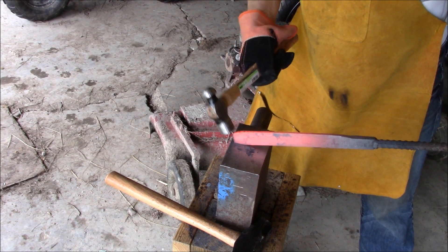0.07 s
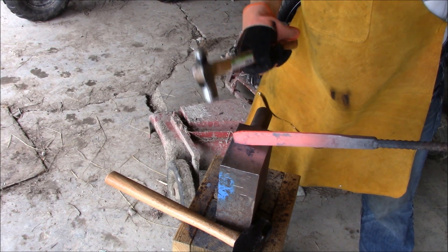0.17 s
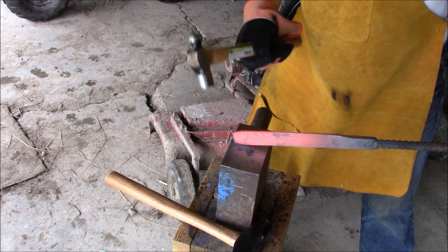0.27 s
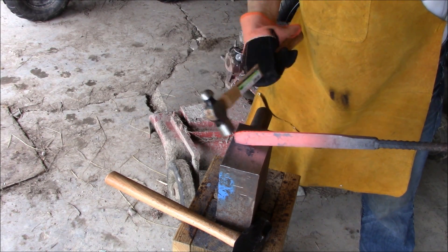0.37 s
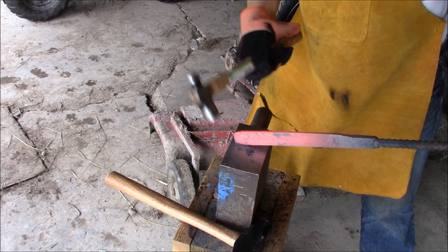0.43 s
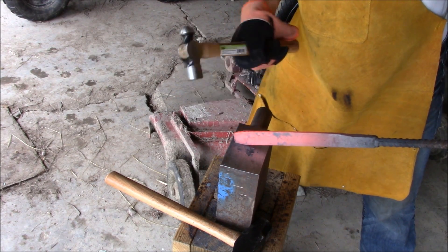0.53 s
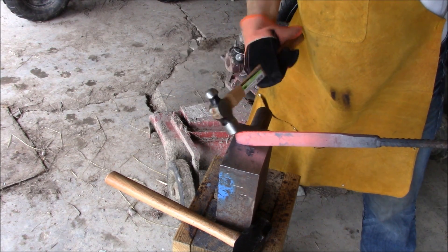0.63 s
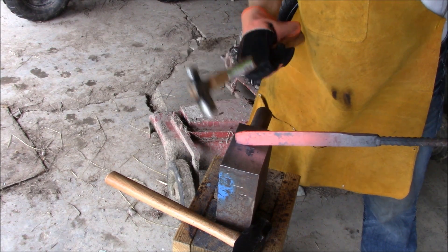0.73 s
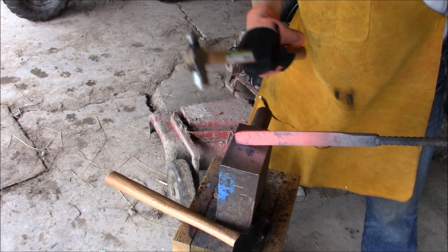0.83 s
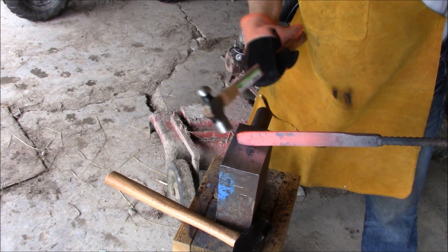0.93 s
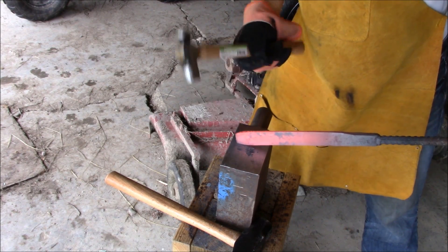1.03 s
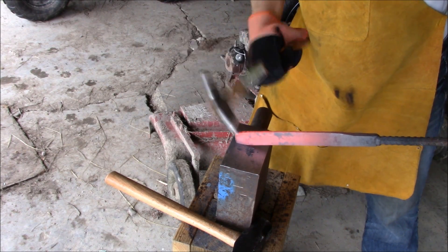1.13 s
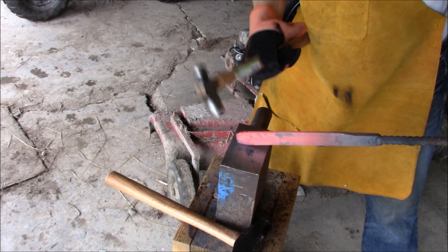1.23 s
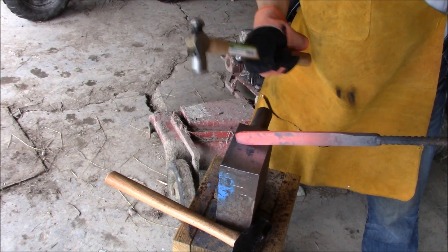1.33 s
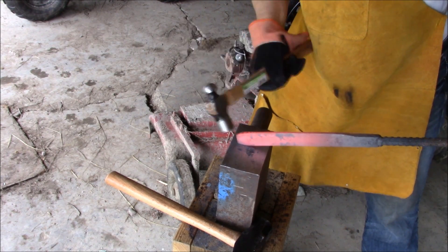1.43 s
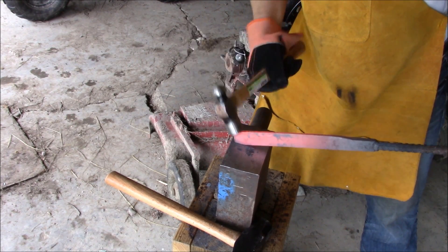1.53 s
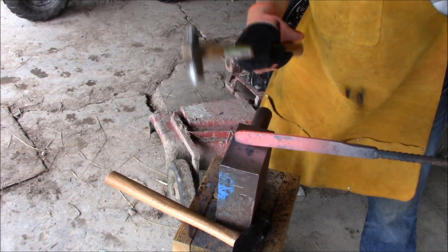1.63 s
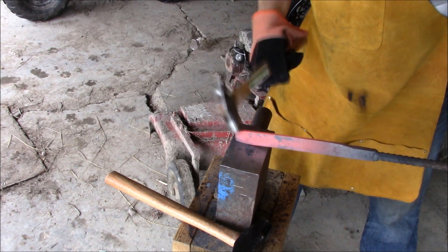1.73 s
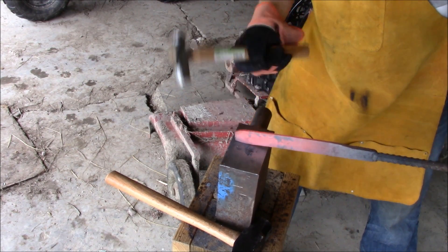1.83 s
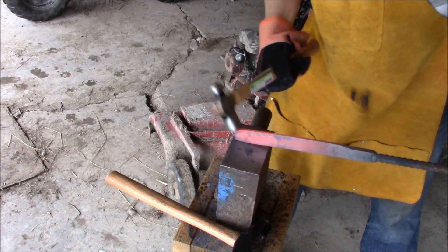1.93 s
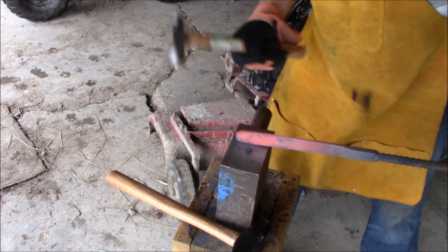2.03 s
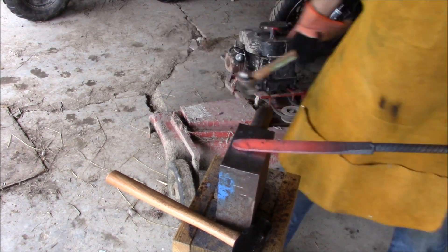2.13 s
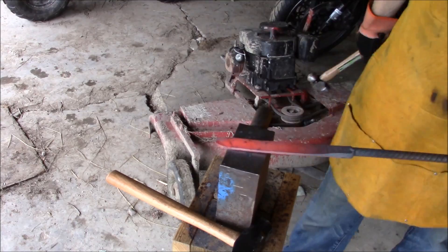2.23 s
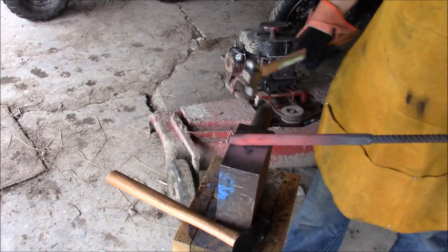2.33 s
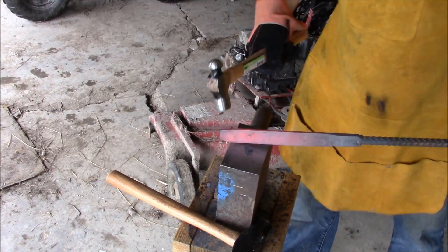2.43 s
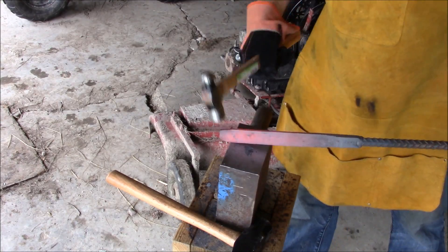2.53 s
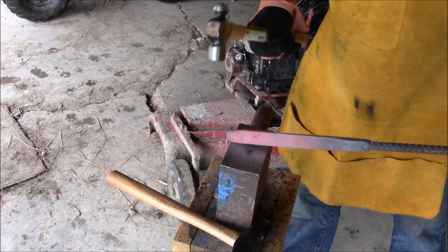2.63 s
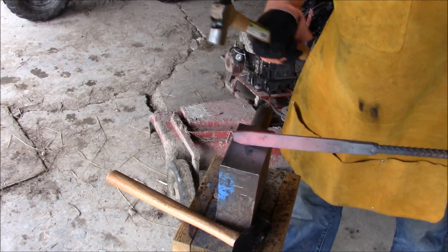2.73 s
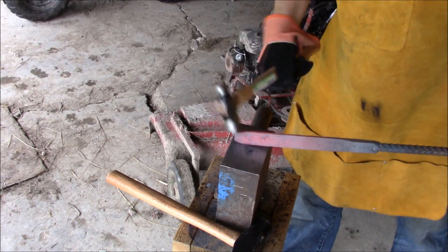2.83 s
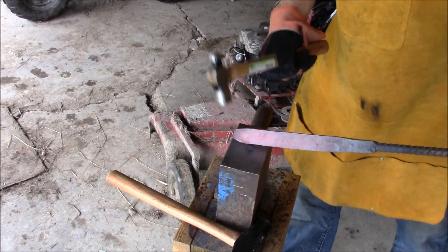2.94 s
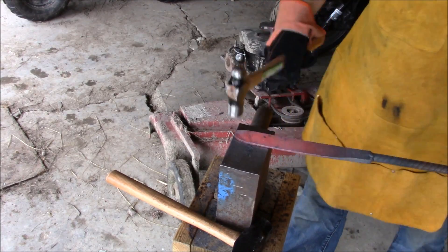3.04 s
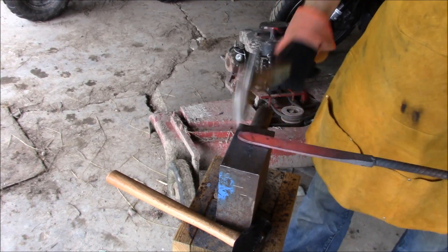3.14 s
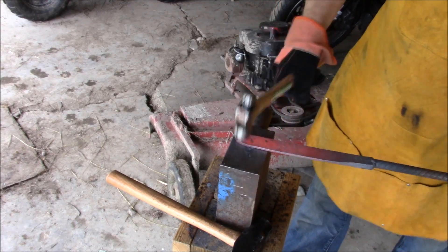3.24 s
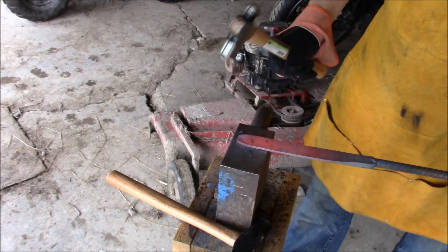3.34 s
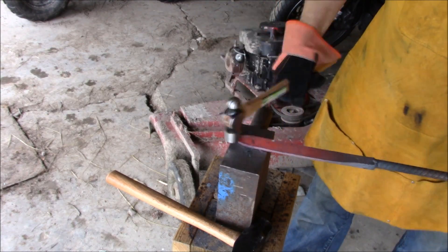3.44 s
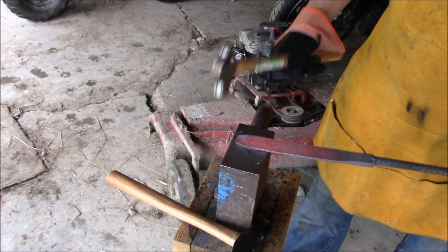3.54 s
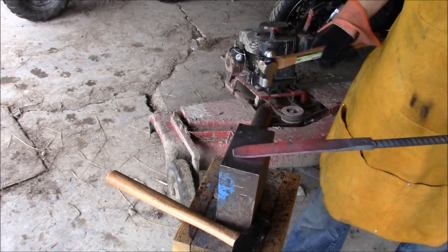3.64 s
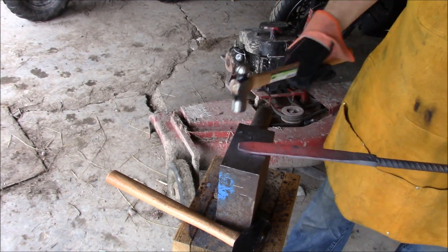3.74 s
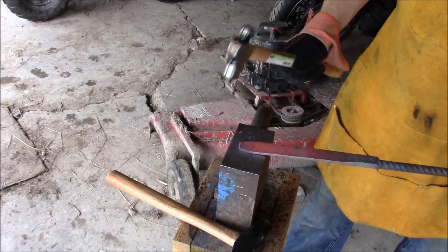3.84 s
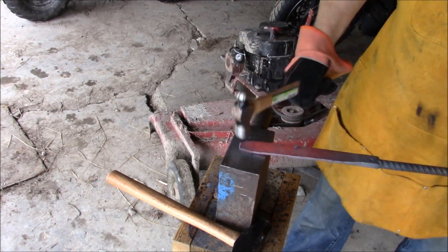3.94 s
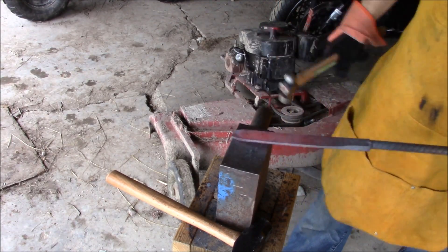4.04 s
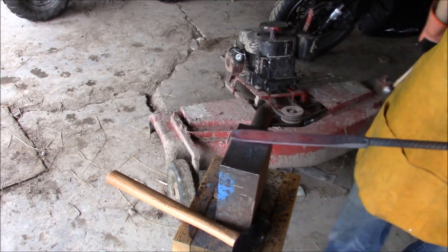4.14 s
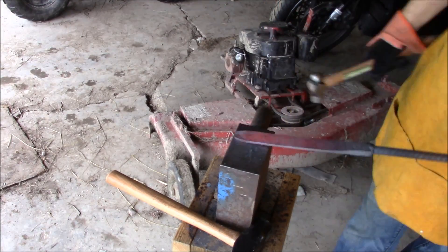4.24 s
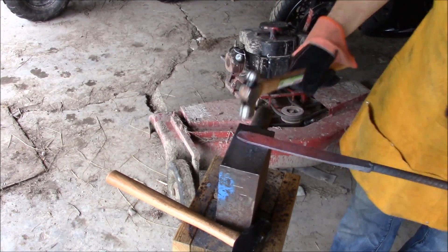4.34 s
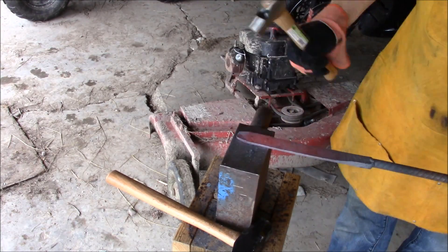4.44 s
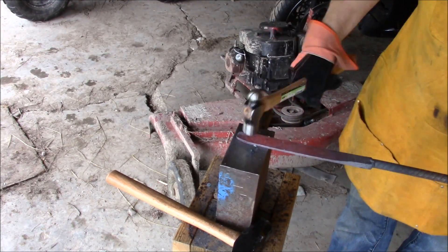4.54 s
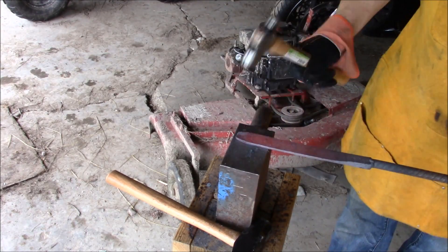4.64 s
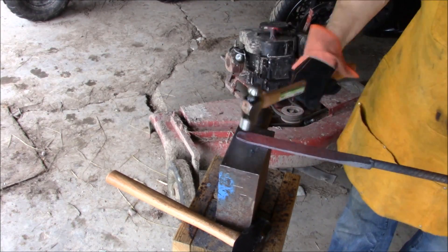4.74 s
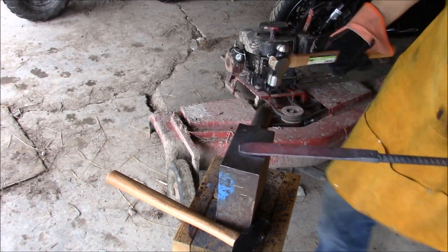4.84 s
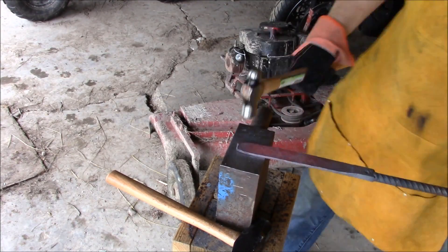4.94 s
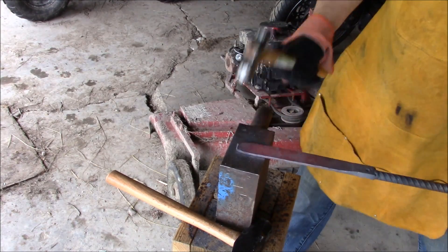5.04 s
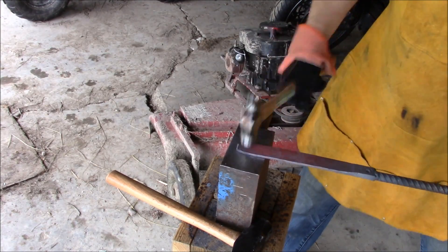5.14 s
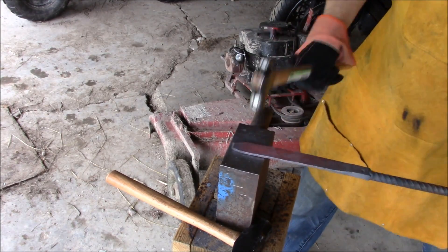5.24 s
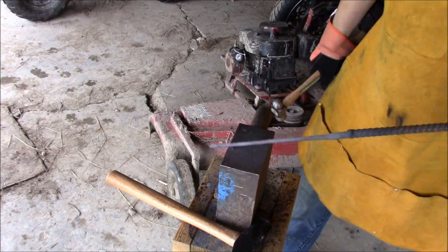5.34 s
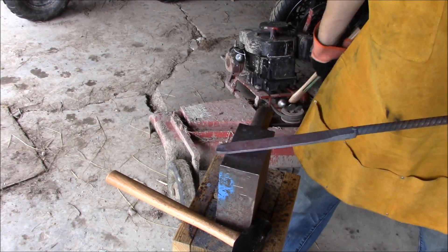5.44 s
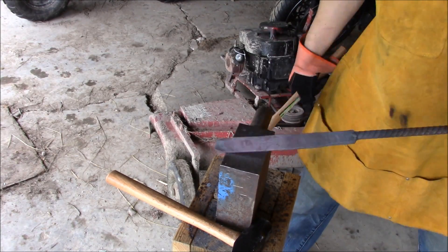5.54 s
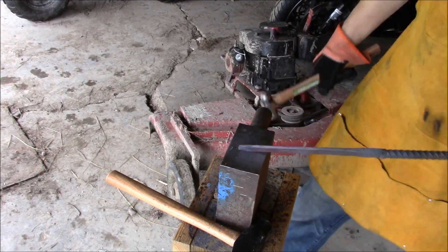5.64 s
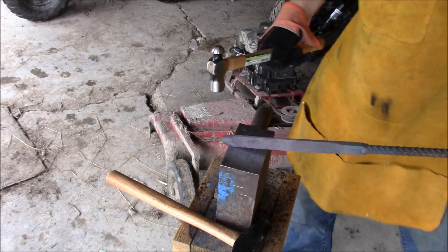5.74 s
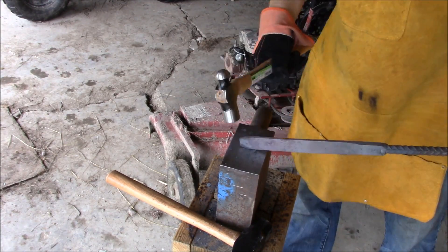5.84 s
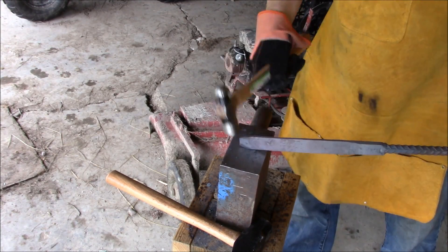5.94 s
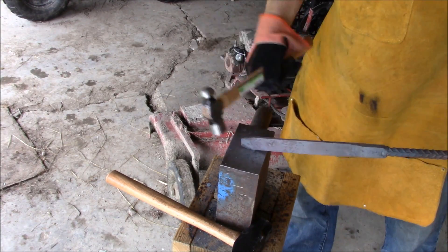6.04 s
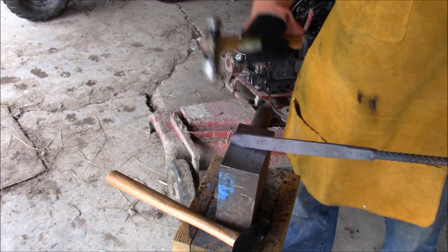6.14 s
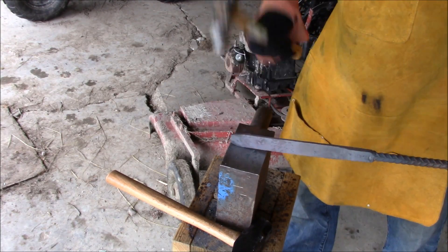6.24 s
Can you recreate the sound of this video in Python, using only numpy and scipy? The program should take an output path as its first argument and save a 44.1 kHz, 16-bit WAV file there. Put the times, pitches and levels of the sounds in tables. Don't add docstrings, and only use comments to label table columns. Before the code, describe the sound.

Close, nearly mono sound of a hammer on a hot steel bar over a small anvil in a bare concrete workshop. Quiet air and a very faint distant hum open it. From 0.3 to 1.4 s come five evenly spaced full blows, slightly growing, each a crack with ringing steel, a low stump thud and short hard-walled echoes. A tiny silence falls near 1.57 s. Then all is four times faster and higher, with brighter hiss: a rapid run of crisp, pinging blows from 1.6 to 2.1 s, faint scrapes and a clink, a light tap at 2.56, more blows 2.75-3.0 and 3.2-3.6, three around 3.9. Clinks, a scrape and a tap fill 4.1-4.45; bright bursts follow at 4.5-4.8 and 5.15-5.3, with knocks and a tap between. Clinks, a knock and a scrape lead to a tap at 5.96 and two last strikes at 6.1 and 6.2 s.

```python
import sys
import numpy as np
from scipy import signal
from scipy.fft import rfft, irfft, next_fast_len
from scipy.io import wavfile
from scipy.ndimage import uniform_filter1d, minimum_filter1d, map_coordinates

SR = 44100
rng = np.random.default_rng(int(sys.argv[2]) if len(sys.argv) > 2 else 0)


def undo_db(level):
    steps = np.asarray(level, float) / 20
    return 10 ** steps


def store_pcm(level_fs):
    pcm = np.round(np.clip(level_fs, -1, 1) * 32767).astype(np.int16)
    wavfile.write(sys.argv[1], SR, np.atleast_2d(pcm).T)


N = 277212
TIME = np.arange(N) / SR
SPEED = 4
TOP_HZ = 16000

# from, to [t/s]
CUT = (1.5592, 1.5918)

# [t/s, strength level/dB, brightness level/dB, own ring f/Hz], some with [own ring level/dB]
SLOW_BLOWS = [
    (0.331, -16, -12, 4000),
    (0.609, -14, -11, 4060),
    (0.873, -13.5, -10.5, 9400),
    (1.127, -12, -12, 6800),
    (1.382, -11.5, -11.5, 9480),
]
EARLIER_BLOW = [
    (1.542, -18.5, -10, 12000),
]
FAST_BLOWS = [(1.609, -15.5, -10, 10300), (1.679, -14.5, -13, 12800), (1.746, -14, -11.5, 10070),
              (1.812, -13.5, -11, 12000), (1.88, -13.5, -12, 12000), (1.945, -13, -14.5, 12000),
              (2.01, -15, -10.5, 12000), (2.075, -14.5, -12, 12000), (2.752, -20, -11, 12900),
              (2.834, -19, -9, 9800), (2.909, -16, -10, 9810), (2.976, -12.5, -13.5, 9420),
              (3.216, -18.5, -18.5, 6800), (3.294, -15, -10.5, 8900), (3.368, -16, -8.5, 12000),
              (3.435, -15.5, -11.5, 12000), (3.503, -15.5, -9.5, 12000), (3.57, -16.5, -8.5, 12000),
              (3.864, -22.5, -10.5, 9200), (3.938, -17, -8.5, 8900), (4.007, -18.5, -8, 12000),
              (4.537, -17, -9, 12000), (4.609, -17, -8, 12000), (4.674, -15.5, -8.5, 12000),
              (4.737, -17, -8.5, 9600), (4.805, -18, -5.5, 12000), (5.154, -15, -8.5, 12000),
              (5.214, -16.5, -7, 12000), (5.275, -16.5, -7, 12000), (6.093, -18, -7, 12900),
              (6.232, -21.5, -9, 13000)]
TAPS = [
    (2.563, -22.5, -20, 3660, 5.5),
    (3.129, -17, -26.5, 12900, -8.5),
    (4.428, -15, -22.5, 4760, -0.5),
    (5.053, -14, -22.5, 4140, -5),
    (5.964, -19, -19, 4500, 2.5),
]
CLINKS = [(2.161, -43.5, -9, 6390, 8), (2.295, -27, -30, 3030, -9), (3.691, -32.5, -14, 6850, 4),
          (3.699, -34, -15, 13400, -4), (3.7092, -39, -9, 6890, 1), (3.761, -32, -18, 12900, 7),
          (4.0945, -34, -16.5, 9000, -10), (4.109, -33, -12, 6780, 5), (4.2944, -61, -4, 3320, -10),
          (4.3031, -34.5, -9.5, 9600, -3), (4.9053, -39.5, -6.5, 11700, -3),
          (5.4281, -25.5, -17.5, 14400, -4), (5.5244, -68, -4, 3120, -8), (5.6474, -28.5, -23, 8150, 7)]
KNOCKS = [
    (0.022, -60.5, -3, 1890, -14),
    (2.176, -44, -30, 1500, 3),
    (4.877, -35, -18, 1300, -4),
    (4.882, -48, -5, 988, -6),
    (4.97, -35, -9.5, 1920, 6),
    (5.407, -55, -21, 970, 2),
    (5.742, -36, -5, 1180, 5.5),
]
# [loudest t/s, level/dB, centre f/Hz, rise t/s, fall t/s]
DRAGS = [
    (2.239, -50, 4600, 0.012, 0.046),
    (2.278, -39, 4250, 0.033, 0.016),
    (4.201, -34.5, 6350, 0.015, 0.037),
    (5.839, -33, 6450, 0.02, 0.044),
]

# [f/Hz, width f/Hz, level/dB]; bar and anvil at true speed
SLOW_RING = [(463, 12, -2), (695, 43, -2), (806, 72, -1.5), (1014, 45, 1), (1180, 120, -4),
             (1714, 106, -3.5), (1914, 17, 0), (2514, 260, -4.5), (3140, 154, -6.5),
             (4040, 67, -5), (4750, 67, -7.5), (4970, 37, -2.5), (5720, 58, -15), (5980, 120, -0.5),
              (6760, 43, -8), (7125, 100, -3), (7400, 57, -12), (8180, 180, -7), (8600, 46, -28),
              (9200, 330, -15.5), (9560, 170, -9.5), (10630, 47, -9.5), (11200, 67, -14)]
FAST_RING = [(1310, 30, -7), (1850, 30, -12.5), (1910, 30, -21), (2740, 290, -9), (3280, 280, -12),
             (4020, 530, -9), (4760, 60, -7.5), (7400, 130, -9.5), (7910, 160, -10.5), (9800, 110, -15),
             (9600, 140, -6), (10170, 125, -6), (12000, 60, -7), (13440, 230, -9)]
TAP_RING = [(992, 77, 7.5), (1920, 75, 6), (3650, 540, 0), (4180, 410, -2.5), (4600, 160, 1),
            (8050, 78, -12), (9800, 140, -14), (10270, 220, -2.5), (12000, 130, -15), (14200, 250, -20)]
CLINK_RING = [(1890, 17, 0), (5000, 69, 12), (6890, 25, 18), (8100, 30, 9), (9580, 100, 12), (11700, 49, 6),
              (12900, 63, 4), (15300, 63, -3)]

# [f/Hz, level/dB per Hz]
SLOW_TONE = [(40, -56), (150, -9), (250, 2.5), (410, -4.5), (1000, -3), (8000, -19.5), (14000, -25),
             (16500, -53)]
FAST_TONE = [(100, -60), (300, -23), (500, -11), (1000, 0), (2500, -6), (6000, -5), (12000, -4.5),
             (16500, -13.5)]
CLINK_TONE = [(180, -54), (300, 6.5), (1930, 22), (6340, 10), (6900, 15), (14900, 20), (16500, 17)]
KNOCK_TONE = [(180, -51), (300, -9), (1960, -3.5), (3590, -9), (12600, -31), (14900, -41), (16500, -26)]
DRAG_TONE = [(180, -72), (300, -62), (1000, -3), (1630, -9.5), (6670, -5.5), (14700, -11.5), (15700, -15),
             (16500, -37)]

# [f/Hz, t60 t/s]
STUMP = [(101, .6), (156, .5), (193, .45), (250, .45), (328, .4)]
SLOW_STUMP_DB = [-11.5, -8.5, -4.5, 1.5, -1]
FAST_STUMP_DB = [-11, -2.5, -2, -3, -8.5]
SCATTER_DB = dict(slow=1.3, fast=2.0, tap=1.5)

# [f/Hz, t60 t/s]
SHOP = [(60, 0.68), (210, 0.49), (560, 0.48), (1500, 0.41), (4000, 0.38), (8000, 0.28), (11000, 0.27),
        (16000, 0.22)]
# [f/Hz, t/s]
BUILD = [(200, 0.0083), (1000, 0.0058), (3000, 0.011), (10000, 0.0046)]
# [f/Hz, level/dB per Hz]
SLOW_AIR = [(25, -29), (245, -25), (339, -26.5), (420, -26), (800, -19), (1000, -24.5), (3060, -36.5),
            (16500, -58.5)]
# [f/Hz, level/dB per Hz]
FAST_AIR = [(15, -41), (150, -16), (304, -7.5), (902, 0), (3320, 2.5), (10100, -12), (12200, -8),
            (16500, -18)]
AIR_DB = -57.5, -54.5
# [f/Hz, level/dB]
MOTOR = [
    (646.0, -60),
]
# [f/Hz, level/dB]
WIDTH = [(60, -31), (125, -44), (250, -36), (1000, -32), (2000, -24), (4000, -19), (8000, -18),
         (15000, -13)]


def unit(x):
    return x / np.sqrt(np.mean(x ** 2) + 1e-20)


def along(points, hz):
    f, v = np.transpose(points)
    return np.interp(np.log(hz + 1), np.log(f + 1), v)


def coloured(x, points):
    length = x.shape[-1]
    m = next_fast_len(length + 8192)
    gain = undo_db(along(points, np.fft.rfftfreq(m, 1 / SR)))
    return irfft(rfft(x, m) * gain, m)[..., :length]


def causal(db):
    c = irfft(np.maximum(db, -120) * np.log(10) / 20)
    half = len(c) // 2
    c[1:half] *= 2
    c[half + 1:] = 0
    return np.exp(rfft(c))


def air():
    z = signal.stft(rng.standard_normal((2, N)), nperseg=512)[2]
    patches = uniform_filter1d(rng.standard_normal(z.shape[1:]), size=14, axis=0)
    patches = uniform_filter1d(patches, size=9, axis=1)
    hush = signal.istft(z * undo_db(1.9 * unit(patches)), nperseg=512)[1][:, :N]
    slow = undo_db(AIR_DB[0]) * unit(coloured(hush, SLOW_AIR))
    fast = undo_db(AIR_DB[1]) * unit(coloured(hush, FAST_AIR))
    drift = map_coordinates(rng.standard_normal(80), [TIME * 9])
    (hz, db), = MOTOR
    start_up = np.clip((TIME - .1) / 0.033, 0, 1)
    slow[0] += undo_db(db + 3.5 + 1.1 * drift) * start_up * np.sin(2 * np.pi * hz * TIME + 0.48 * drift)
    return np.where(TIME < CUT[1], slow, fast)


def walls_answer(size, speed):
    window = 256 // speed
    hz, t, z = signal.stft(rng.standard_normal((2, size)), SR, nperseg=window)
    rise = 1 - np.exp(-t * speed / along(BUILD, hz / speed)[:, None])
    decay = undo_db(-60 * t * speed / along(SHOP, hz / speed)[:, None])
    x = signal.istft(z * rise * decay, SR, nperseg=window)[1][:, :size]
    return x / np.linalg.norm(x[0])


def strikes(table, ring, tone, speed, ring_db, boom_db, wet_db, boost_db, same=0.93, scatter_db=4.0, crack_s=0.053,
            click_db=2.5, late_s=0.001044, thud_slope=-.4, stump_db=FAST_STUMP_DB, reach=3.6, narrowest_hz=21,
            own_ring_db=-4):
    size = 32768 // speed
    out = np.zeros((2, N + size))
    hz, t = np.fft.rfftfreq(2 * size, 1 / SR), np.arange(size) / SR
    walls = rfft(walls_answer(size, speed), 2 * size)
    octave = np.log2((hz + 1) / (500 * speed))
    usual_db, usual_bright = np.mean(table, axis=0)[1:3]
    small = (1j * hz / (1j * hz + 260 * speed)) ** 2
    swell = (1 - np.exp(-t * speed / 0.0081)) ** 2
    share = same ** np.clip(hz / (700 * speed), .1, 1)
    for s, db, bright_db, own_hz, *own_db in table:
        thud_db = thud_slope * (db - usual_db)

        modes = list(ring) + [(own_hz, 1.6 * narrowest_hz * speed, own_ring_db)]
        luck = rng.normal(0, scatter_db, len(modes))
        bell = 0
        for (c, width, level), stray in zip(modes, luck):
            damping = (hz * max(width, narrowest_hz * speed)) ** 2
            bell = bell + undo_db(2 * (level + stray)) * damping / ((c * c - hz * hz) ** 2 + damping)
        power = undo_db(2 * along(tone, hz)) + undo_db(2 * (ring_db + sum(own_db))) * bell
        tilt_db = thud_db * np.clip(-octave, 0, 1)
        tilt_db = tilt_db + (bright_db - usual_bright) * np.clip(octave / 2, 0, reach)
        body = causal(10 * np.log10(power / power.mean()) + tilt_db)

        crack = rng.standard_normal((2, size)) * undo_db(-60 * t * speed / crack_s)
        crack = crack * (1 - np.exp(-t * speed / 0.00093))
        crack = rfft(crack / np.linalg.norm(crack[0]), 2 * size)
        direct = small * (undo_db(click_db) * np.sign(crack[:, :1].real) + crack)
        fresh_walls = rfft(walls_answer(size, speed), 2 * size)
        room = np.sqrt(share) * walls + np.sqrt(1 - share) * fresh_walls
        heard = irfft(body * (direct + undo_db(wet_db) * room))[:, :size]

        boom = 0
        for (c, t60), level in zip(STUMP, stump_db):
            fading = undo_db(level + rng.normal(0, 2.6) - 60 * t * speed / t60)
            boom = boom + fading * np.sin(2 * np.pi * c * speed * t)
        heard += undo_db(boom_db + thud_db) * swell * boom
        out[:, round((s + late_s) * SR):][:, :size] += undo_db(db + boost_db) * heard
    return out[:, :N]


def knocks():
    return strikes(KNOCKS, TAP_RING[:1], KNOCK_TONE, SPEED, ring_db=2.0, boom_db=-37.5, wet_db=0.5, boost_db=24,
                   thud_slope=-0.54)


def drags():
    out = np.zeros((2, N))
    size = 8192
    hold_s, range_db = 0.013, 25.5
    for s, db, centre_hz, rise_s, fall_s in DRAGS:
        a = round(s * SR) - size // 2
        grit = rng.standard_normal((2, size)) * undo_db(1.86 * rng.exponential(1, size))
        hz, t, z = signal.stft(coloured(grit, DRAG_TONE), SR, nperseg=256)
        bump_db = 8 * np.exp(-np.log((hz[:, None] + 1) / centre_hz) ** 2 / .07)
        rub = unit(signal.istft(z * undo_db(bump_db), SR, nperseg=256)[1][:, :size])
        lag = TIME[a:a + size] - s
        away = np.maximum(np.abs(lag) - hold_s, 0) / np.where(lag < 0, rise_s, fall_s)
        out[:, a:a + size] += rub * undo_db(db - range_db * away)
    return out


def clinks():
    return strikes(CLINKS, CLINK_RING, CLINK_TONE, SPEED, ring_db=13, boom_db=-55, wet_db=7.5, boost_db=11.5,
                   scatter_db=1, narrowest_hz=9.4, own_ring_db=14.5, thud_slope=-0.57)


def taps():
    return strikes(TAPS, TAP_RING, FAST_TONE, SPEED, ring_db=3.0, boom_db=-49, wet_db=5.5, boost_db=16, click_db=-3.5,
                   crack_s=.04, scatter_db=SCATTER_DB['tap'], thud_slope=-0.15)


def fast_blows():
    return strikes(EARLIER_BLOW + FAST_BLOWS, FAST_RING, FAST_TONE, SPEED, ring_db=7, boom_db=-29,
                   own_ring_db=-2.0, same=0.74, wet_db=9.5, boost_db=20.0, scatter_db=SCATTER_DB['fast'],
                   thud_slope=-0.2)


def slow_blows():
    return strikes(SLOW_BLOWS, SLOW_RING, SLOW_TONE, speed=1, ring_db=2.0, boom_db=-38.5, wet_db=2.5,
                   boost_db=26.0, click_db=-17, crack_s=0.03, late_s=0, thud_slope=0.19, stump_db=SLOW_STUMP_DB,
                   scatter_db=SCATTER_DB['slow'], reach=3.7)


def stereo(pair, slow_kept=1.0, fast_kept=0.15, slow_db=2, fast_db=5):
    hz, t, z = signal.stft(coloured(pair[1], WIDTH), SR, nperseg=512)
    band = (np.sqrt(hz / hz[-1]) * 23.9).astype(int)
    draw = rng.random((24, len(t)))[band]
    slow = t < CUT[1]
    frame = np.arange(len(t))
    frame = np.where(slow, frame // 12 * 12, frame // 4 * 4)
    chance = np.where(slow, slow_kept, fast_kept) * along([(1500, 1.6), (11000, .8), (13500, .3)], hz)[:, None]
    kept = draw[:, frame] < chance
    side = signal.istft(z * kept * undo_db(np.where(slow, slow_db, fast_db)), SR, nperseg=512)[1][:N]
    return np.array([pair[0] + side, pair[0] - side])


def scene():
    slow = slow_blows()
    fast = fast_blows() + taps() + clinks()
    return stereo(np.where(TIME < CUT[0], slow, fast) + knocks() + drags() + air())


def limiter(x, ceiling_db, release_db, attack_s, depth):
    speed = np.where(TIME < CUT[1], 1, SPEED)
    climb = release_db * np.cumsum(speed) / SR
    held = np.maximum.accumulate(20 * np.log10(np.abs(x).max(0) + 1e-6) + climb) - climb
    cut_db = depth * np.maximum(held - ceiling_db, 0)
    rates = np.clip(np.array([1, SPEED]) / (attack_s * SR), 1e-3, 1)
    lag = [signal.lfilter([k], [1, k - 1], cut_db) for k in rates]
    return x * undo_db(-np.where(speed == 1, *lag))


def thin_hush(x, ahead_s=0.0042, under_db=-24, loss_db=-8):
    size = max(round(ahead_s * SR), 2)
    level = uniform_filter1d(np.abs(x).max(0), size=32)
    coming = -minimum_filter1d(-np.roll(level, -size // 2), size=size)
    quiet = 1. * (level < coming * undo_db(under_db))
    return x * undo_db(loss_db * uniform_filter1d(quiet, size=24))


def drop_faint_treble(x, floor_db=-80, from_hz=12300):
    hz, t, z = signal.stft(x, SR, nperseg=256)
    level = uniform_filter1d(np.abs(z).mean(0), size=9, axis=1)
    level = uniform_filter1d(level, size=5, axis=0)[np.arange(len(hz)) // 5 * 5]
    faint = (level < undo_db(floor_db)) & (hz[:, None] > from_hz) & (t < CUT[0])
    return signal.istft(z * ~faint, SR, nperseg=256)[1][:, :N]


def band_limit(x):
    return signal.sosfilt(signal.butter(12, 17140, fs=SR, output="sos"), x)


def record(dry):
    x = limiter(dry, ceiling_db=-9.0, release_db=349, attack_s=0.0083, depth=1.0)
    x = x / (1 + np.abs(x / .55) ** 4) ** (1 / 4)
    x = np.where(TIME < CUT[1], x, coloured(x, [(120, -7), (280, -1)]))
    x = x * ((TIME < CUT[0]) | (TIME > CUT[1]))
    x = drop_faint_treble(thin_hush(x))
    x = coloured(x, [(TOP_HZ - 300, 0), (TOP_HZ + 200, -30), (TOP_HZ + 1200, -60)])
    return band_limit(x)


dry = scene()
out = record(dry)
store_pcm(out)
```